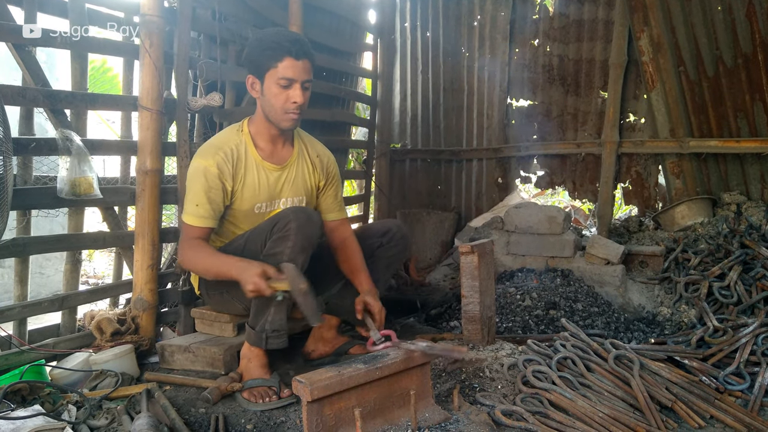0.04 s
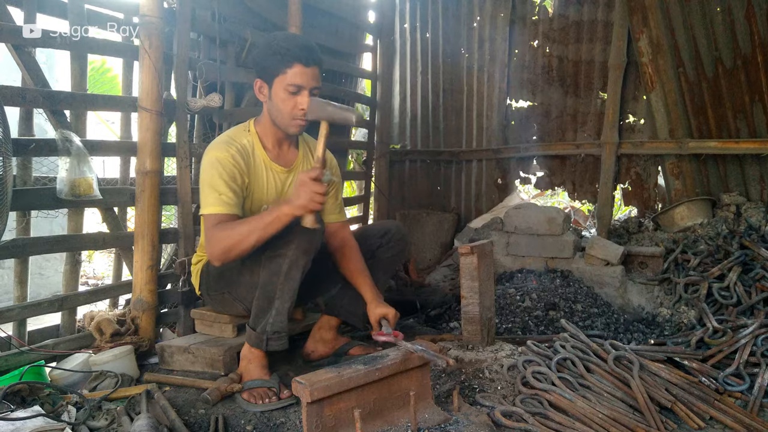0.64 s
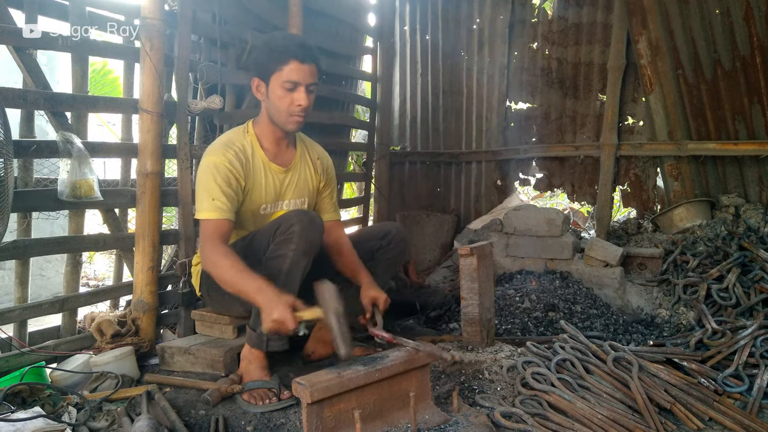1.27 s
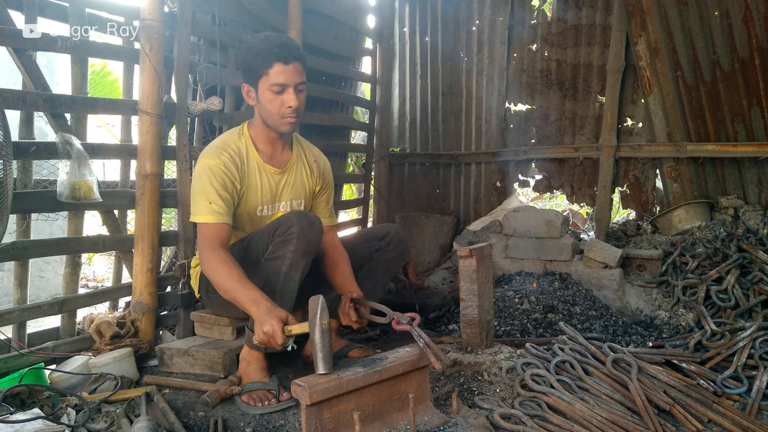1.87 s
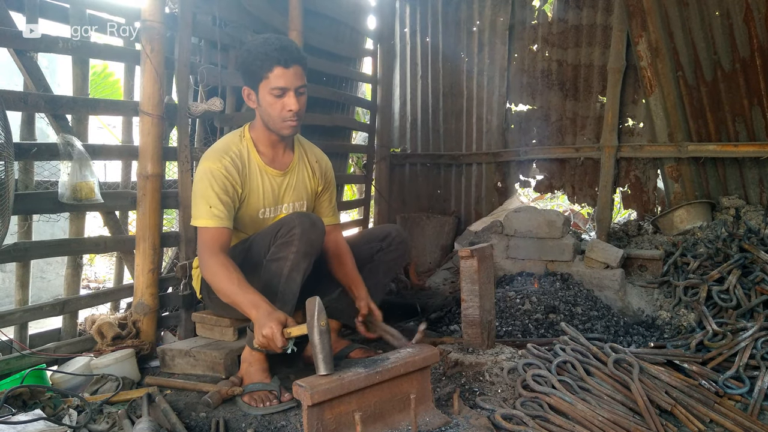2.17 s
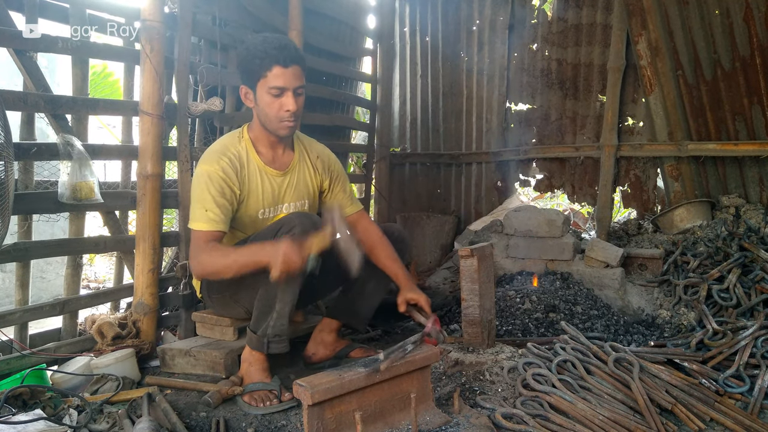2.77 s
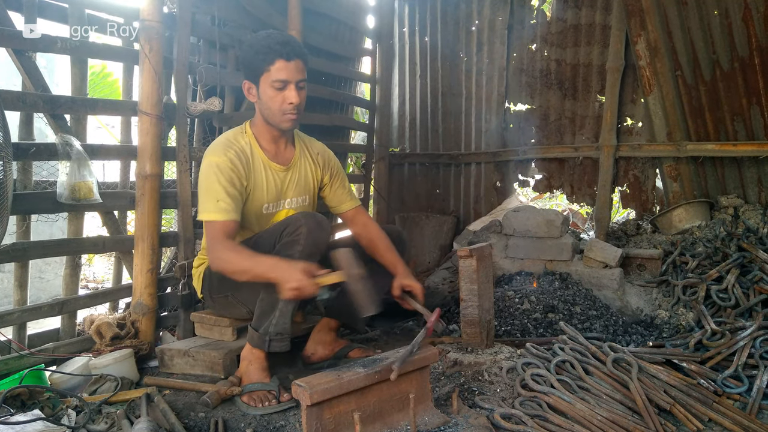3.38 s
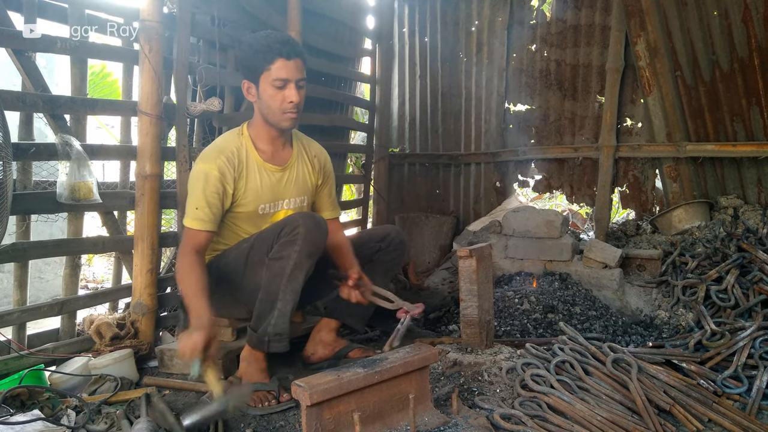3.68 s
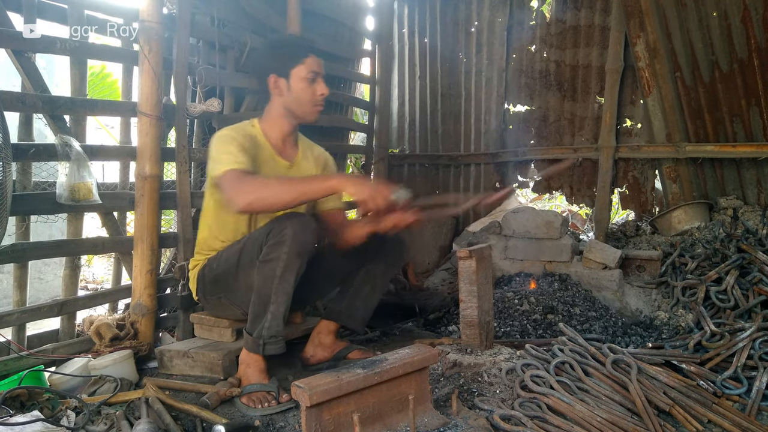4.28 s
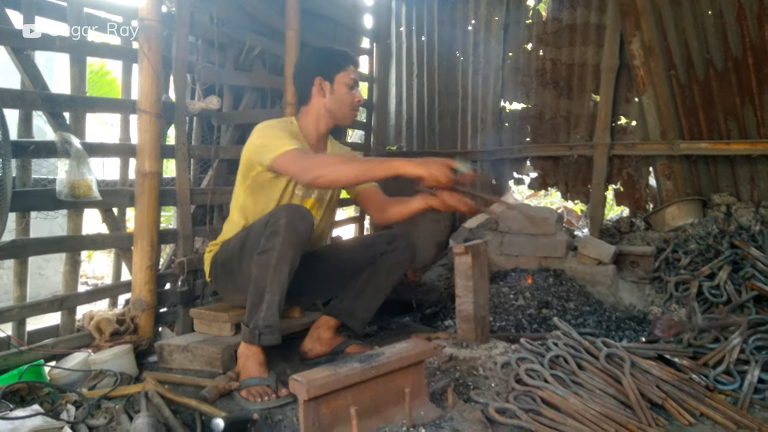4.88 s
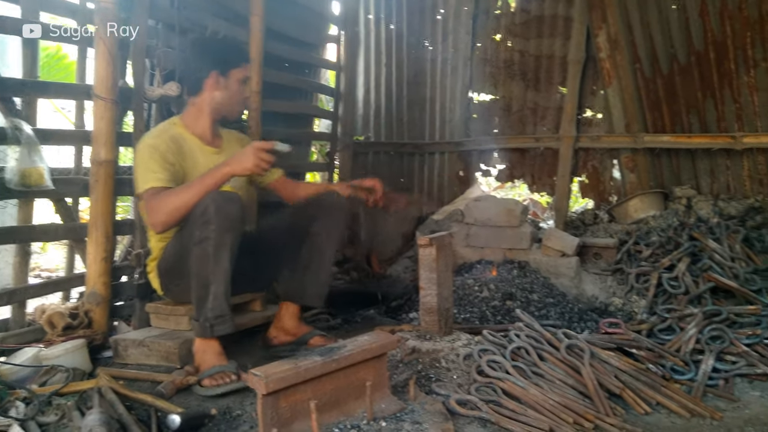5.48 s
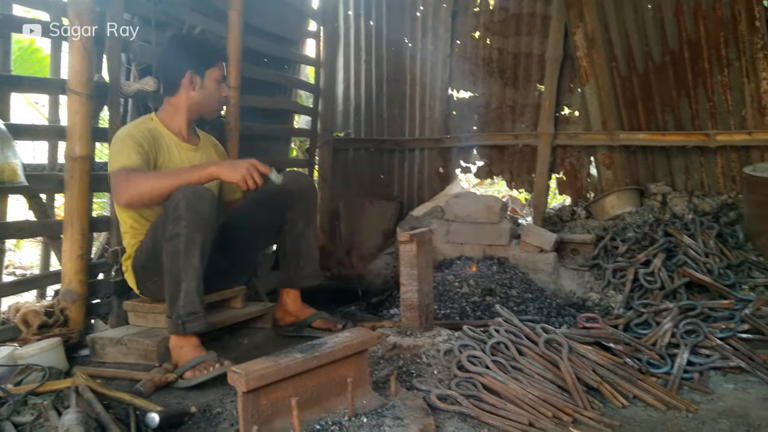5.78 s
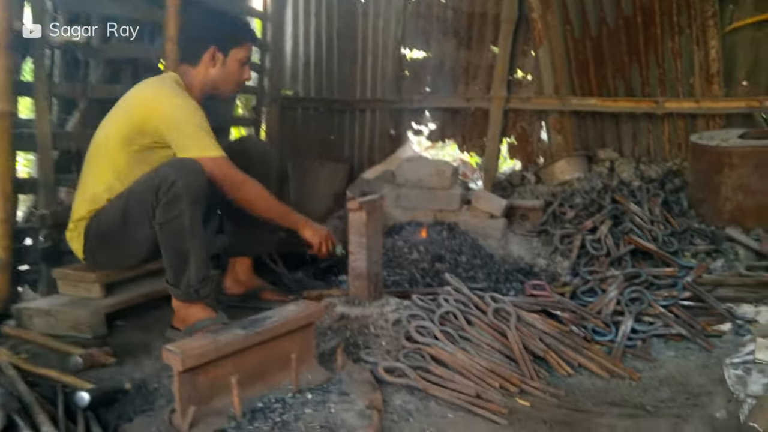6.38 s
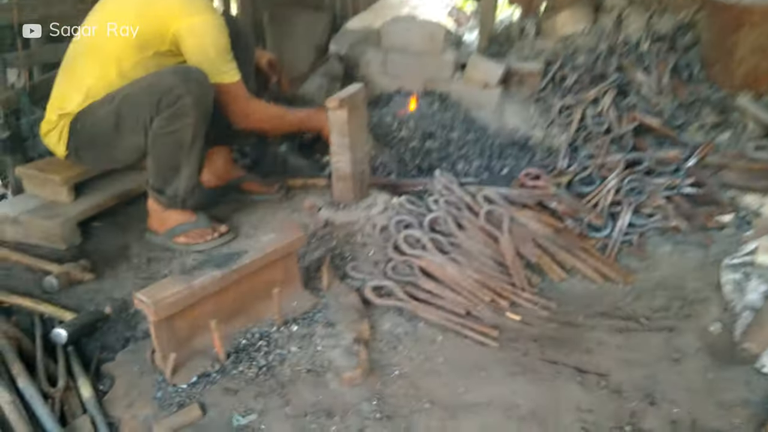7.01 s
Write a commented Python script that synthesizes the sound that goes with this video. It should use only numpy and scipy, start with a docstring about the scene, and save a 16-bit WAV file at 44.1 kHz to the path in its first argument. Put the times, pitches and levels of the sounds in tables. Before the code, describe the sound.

Sharp, ringing hammer blows on an iron anvil, then iron clattering onto iron twice, over a steady forge roar in a small shed.

```python
"""A small tin shed: a smith strikes hot iron on a rail anvil, rests the hammer on it, and strikes again.
He drops the hammer among his tools and throws the forged piece onto a heap of iron. Each impact cracks,
thuds and rings the iron's modes, echoed by the walls; tongs tick and iron scrapes in between.
Air blown through the crackling forge roars throughout, and a distant engine gathers speed outside.
The blows overload the microphones."""
import sys
import numpy as np
from scipy import signal
from scipy.fft import rfft, irfft
from scipy.io import wavfile
from scipy.ndimage import uniform_filter1d

SR = 44100
rng = np.random.default_rng(int(sys.argv[2]) if len(sys.argv) > 2 else 0)


def unload_wav(signal):
    """Save mono or channel-first audio to the path in sys.argv[1] as 16-bit WAV at rate SR, clipped to [-1, 1]."""
    wavfile.write(
        sys.argv[1],
        SR,
        np.round(np.clip(np.atleast_2d(signal).T, -1, 1) * 32767).astype(np.int16),
    )


N = 310905
AGE_S = np.arange(24576) / SR  # time since an impact

# Spectra of a sharp snap and of loose iron colliding. Each row: frequency in Hz, density in dB.
SNAP_SPECTRUM = [(300, -14), (1500, -63), (3000, -15), (5500, -8), (8000, 0.5), (10000, 1.5), (12000, 6),
                 (13500, -2.5), (15500, -7)]
CLANK_SPECTRUM = [(300, -29), (1500, -14), (3000, -12), (5500, -10), (8000, -2.5), (10000, -2),
                  (12000, 1.5), (13500, 1), (15500, -10)]
# Resonances of the tool pile. Each row: centre in Hz, width in Hz, boost in dB.
TOOL_PILE_PEAKS = [(3120, 1100, 8), (7100, 500, -1), (11500, 440, 7)]
# Iron landing on iron. Each row: start in seconds, object, then crack, thud, ring and left-right in dB.
CLANKS = [(3.8734, "tools", 7, 0, 2, 5.5), (3.892, "tools", -7, -15, -12, 5),
          (3.9120, "tools", -4.5, -16, -6.5, -5.5), (3.9430, "bar", -9.5, -37, -1.5, -2.5),
          (3.9560, "bar", -10, -46, -24, -1), (3.998, "bar", -30, -42, -27, 6),
          (3.9920, "small tools", -23, -33, -9.5, -2.5), (4.047, "small tools", -28.5, -30, -19, -1),
          (4.8934, "piece", 0, -18.5, -4, -3), (4.9220, "piece", 0, -16, -2.5, 4.5),
          (4.944, "heap", -4.5, -47, -7.5, -12), (4.967, "heap", -16, -50, -11, 0),
          (4.9980, "heap", -14.5, -46, -14, -3), (5.0460, "heap", -20, -46, -19, -2),
          (5.0820, "heap", -24, -41, -16, -3), (5.138, "rod", -27, -37, -19, 2),
          (5.147, "rod", -22, -44, -14.5, -1.5), (5.3205, "tongs", -30, -53, -26, -6),
          (5.3330, "tongs", -39, -50, -13, -5), (5.3480, "tongs", -40, -49, -37, 0)]


def amp(db):
    """Decibels to gain."""
    return 10 ** (np.asarray(db) / 20)


def curve_at(points, hz):
    """Interpolate a table over log frequency."""
    points_hz, value = np.transpose(points)
    return np.interp(np.log(hz + 1), np.log(points_hz + 1), value)


def add(mix, start_s, sound):
    """Mix a stereo sound in at start_s."""
    part = mix[:, round(start_s * SR):][:, :sound.shape[1]]
    part += sound[:, :part.shape[1]]


def decay(t60_s):
    """Exponential decay, 60 dB in t60_s."""
    return amp(-60 * AGE_S / t60_s)


def arch(start_s, length_s):
    """Half-sine envelope."""
    return np.sin(np.pi * np.clip((np.arange(N) / SR - start_s) / length_s, 0, 1))


def waver(rms_db, top_hz):
    """Slow random gain."""
    t = np.arange(0, N, 256) / SR
    rates_hz = np.geomspace(top_hz / 20, top_hz, 20)
    drift = sum(np.sin(2 * np.pi * (hz * t + rng.random())) for hz in rates_hz) / np.sqrt(10)
    return amp(rms_db * np.interp(np.arange(N) / SR, t, drift))


def diffuse_noise(spectrum, size=len(AGE_S), peaks=(), left_lag_s=0.000104):
    """Coloured noise reaching two microphones from all round the shed; unit RMS in mono."""
    # Each row: frequency in Hz, coherence between the microphones.
    coherences = [(60, 1.1), (130, 1), (290, 1.3), (640, 1.13), (1410, 0.09), (3100, 0.44), (6820, -0.2452),
                  (15000, 0.13)]
    # Each row: frequency in Hz, left-right balance in dB.
    balance = [(60, -1), (110, -0.5), (200, 0), (380, 0), (700, 0.5), (1290, 0), (2380, 3.5), (4400, 0),
               (8120, -0.5), (15000, -2.0)]
    hz = np.fft.rfftfreq(size, 1 / SR)
    left, unrelated = rng.standard_normal((2, len(hz))) + 1j * rng.standard_normal((2, len(hz)))
    coherence = np.clip(curve_at(coherences, hz), 0, 1)
    right = coherence * left + np.sqrt(1 - coherence ** 2) * unrelated
    right *= np.exp(2j * np.pi * hz * left_lag_s)
    pan = amp(curve_at(balance, hz) / 2)
    peaks_db = sum(db / (1 + (2 * (hz - centre_hz) / width_hz) ** 2) for centre_hz, width_hz, db in peaks)
    noise = irfft(np.array([left * pan, right / pan]) * amp(curve_at(spectrum, hz) + peaks_db), size)
    return noise / noise.mean(0).std()


def shed_echo(t60_s, tail_db=-34, tail_t60_s=0.74, rise_s=0.00021):
    """Echo envelope: the close walls answer at once and a faint tail lingers."""
    return (decay(t60_s) + amp(tail_db) * decay(tail_t60_s)) * (1 - np.exp(-AGE_S / rise_s))


def forge(rumble_db=-38.5, roar_db=-35.5, hiss_db=-33.5, crackle_db=-48, crackles_per_s=14):
    """Air blown through coals: rumble, humming roar, hiss and faint crackle."""
    # Each row: frequency in Hz, density in dB.
    rumble_spectrum = [(20, -18), (40, -1.5), (56, -7.5), (85, 2), (105, -6.5), (125, -7.5), (200, -13.5),
                       (500, -66)]
    roar_spectrum = [(65, -35), (110, -16), (183, 2.5), (227, -6), (284, -0.5), (403, -6), (439, -3),
                     (567, -1.5), (701, -8.5), (934, -2), (1130, -10), (1400, -10.5), (1820, -62),
                     (3080, -120)]
    hiss_spectrum = [(820, -62), (1400, 0.5), (1490, -9), (1710, 0), (1990, -5.5), (2120, -3), (2460, -3),
                     (2640, -0.5), (3580, -1), (4560, 0.5), (6040, -1.5), (7320, 3), (10000, -5),
                     (11600, -3.5), (15600, -10)]
    # Steady hums. Each row: centre in Hz, width in Hz, boost in dB.
    low_hums = [(70.4, 5.4, 5), (102, 5.4, 6)]
    hums = [(189, 13.4, 2), (401.2, 18.6, 9.2), (562, 11, 3.6), (867.7, 13.5, 9.2), (951, 18, 5.6),
            (1620, 90, 5.9), (2157, 43, 8.2), (2746, 21, 11.1), (5270, 140, 4.2), (7160, 1400, 0.82)]
    rumble = amp(rumble_db) * diffuse_noise(rumble_spectrum, N, low_hums)
    roar = amp(roar_db) * diffuse_noise(roar_spectrum, N, hums) * waver(rms_db=0.5, top_hz=12)
    hiss = amp(hiss_db) * diffuse_noise(hiss_spectrum, N, hums) * waver(rms_db=0.7, top_hz=18)
    impulses = (rng.random(N) < crackles_per_s / SR) * rng.uniform(0.16, 1, N)
    snap = diffuse_noise(SNAP_SPECTRUM) * (decay(0.015) + 0.19 * decay(0.067))
    crackle = signal.oaconvolve(impulses[None], snap, axes=1)[:, :N]
    return rumble + roar + hiss + amp(crackle_db) * crackle / crackle.std()


def engine(idle_hz=43.7, cruise_hz=57, pull_away_s=1.2, run_up_s=4.7, octave_db=-20):
    """A far engine speeds up; only its firing rate and a weak octave reach the shed."""
    # Each row: time in seconds, level in dB.
    levels = [(0.0, -47), (1.95, -45), (2.16, -33), (2.75, -47), (3.48, -33), (4.05, -43), (4.7, -37.5),
              (5.15, -43), (7.05, -50)]
    t = np.arange(N) / SR
    run_up = np.sin(np.pi / 2 * np.clip((t - pull_away_s) / run_up_s, 0, 1)) ** 2
    firing_hz = idle_hz + (cruise_hz - idle_hz) * run_up
    phase = 2 * np.pi * (np.cumsum(firing_hz) / SR + rng.random())
    drone = np.sqrt(2) * (np.sin(phase) + amp(octave_db) * np.sin(2 * phase))
    return drone * amp(np.interp(t, *np.transpose(levels))) * waver(rms_db=1.0, top_hz=3.1)


def hoot_and_squeak():
    """Two faint, brief tones: a far-off hoot and a thin squeak."""
    # Each row: start in seconds, length in seconds, pitch in Hz, level in dB.
    tones = [(-0.02, 0.085, 621, -31.5), (6.574, .12, 2710, -45)]
    t = np.arange(N) / SR
    return sum(amp(db) * arch(start_s, length_s) * np.sin(2 * np.pi * hz * t)
               for start_s, length_s, hz, db in tones)


def scrapes(grain_db=3, grains_per_s=500):
    """Iron dragged over iron and grit, catching as it goes."""
    # Each row: start in seconds, length in seconds, level in dB.
    strokes = [(0.202, 0.024, -33), (0.318, 0.072, -34.5), (0.876, .07, -33.5), (2.943, 0.036, -31.5),
               (3.076, 0.091, -34.5), (5.31, 0.039, -32), (6.6, 0.04, -35.5), (6.758, 0.052, -34.5),
               (6.908, 0.04, -32.5)]
    # Each row: frequency in Hz, density in dB.
    spectrum = [(500, 0), (2000, -0.5), (5000, 1.5), (8000, 2.5), (12000, -5), (15500, -21)]
    grains = rng.standard_normal(N)[(np.arange(N) * grains_per_s / SR).astype(int)]
    envelope = sum(amp(db) * arch(start_s, length_s) for start_s, length_s, db in strokes)
    return diffuse_noise(spectrum, N) * envelope * amp(grain_db * grains)


def ticks(events, echo_db=-10, snap_t60_s=0.0094):
    """A short, bright snap and its echo for each event."""
    # Each row: frequency in Hz, density in dB.
    spectrum = [(300, -22), (1500, -7), (5500, -10), (8000, -2), (12000, 2.5), (13500, -8), (15500, -10)]
    out = np.zeros((2, N))
    envelope = decay(snap_t60_s) + amp(echo_db) * shed_echo(t60_s=0.26)
    for start_s, db in events:
        add(out, start_s, amp(db) * diffuse_noise(spectrum) * envelope)
    return out


def tong_touches():
    """The tongs tap the work lightly."""
    # Each row: start in seconds, level in dB.
    touches = [(0.421, -22.5), (0.939, -24.5), (1.947, -22), (2.951, -26), (4.7889, -27.5)]
    return ticks(touches)


def coal_pops(count=6, max_db=-26.5, range_db=7):
    """Coals pop at random times and levels."""
    return ticks([(when * N / SR, max_db - range_db * drop) for when, drop in rng.random((count, 2))])


def crack(spectrum, t60_s, peaks=()):
    """The snap of contact, scattered by the tin walls."""
    return diffuse_noise(spectrum, peaks=peaks) * shed_echo(t60_s)


def air_push(at_s, width_s):
    """A dip in pressure and its rebound."""
    u = (AGE_S - at_s) / width_s
    return 2 * u * np.exp(-u ** 2 / 2)


def thud(t60_s, push_db, wash_db=0, push_s=0.00053, lag_s=0.002, low_cut_hz=160):
    """The struck mass, too small for deep bass, shoves the air once; reflections and a wash follow."""
    # Near walls. Each row: delay in seconds, level in dB, left-right in dB.
    walls = [(.0035, -18, 4), (0.0114, -10.5, -3), (0.0181, -19, 7), (.027, -17.5, -5)]
    # Each row: frequency in Hz, density in dB.
    wash_spectrum = [(30, -10), (90, 5), (180, -7), (300, 0.5), (500, -1.5), (850, -2), (1300, -2),
                     (2500, -3.5), (5000, -3.5), (12000, -13.5)]
    echoes = sum(amp([[db + pan_db / 2], [db - pan_db / 2]]) * air_push(lag_s + delay_s, push_s)
                 for delay_s, db, pan_db in walls)
    low_cut = signal.butter(2, low_cut_hz, "high", fs=SR)
    knock = signal.lfilter(*low_cut, air_push(lag_s, push_s) + echoes)
    wash = diffuse_noise(wash_spectrum) * shed_echo(t60_s)
    return amp(wash_db) * wash + amp(push_db) * knock


def ring(modes, wet_db=-3, echo_t60_s=0.16, right_lag_s=5.1e-5):
    """Struck iron rings in decaying modes, heard directly and blurred by the walls."""
    age_s = AGE_S - np.array([[0], [right_lag_s]])
    echoes = rng.standard_normal((2, len(AGE_S))) * shed_echo(echo_t60_s)
    room = (AGE_S == 0) + amp(wet_db) * echoes / np.linalg.norm(echoes, axis=1, keepdims=True)
    room_power = uniform_filter1d((abs(rfft(room)) ** 2).mean(0), size=9)
    flatten = np.sqrt(room_power.mean() / room_power)  # keeps the modes' balance through the room
    bins_hz = np.fft.rfftfreq(len(AGE_S), 1 / SR)
    direct = np.zeros_like(age_s)
    for hz, db, t60_s in modes:
        gain = amp(db) * np.interp(hz, bins_hz, flatten)
        direct += gain * decay(t60_s) * np.sin(2 * np.pi * (hz * age_s + rng.random()))
    return signal.fftconvolve(direct, room, axes=1)[:, :len(AGE_S)]


def hammering():
    """Each blow cracks, thuds and rings the rail, the hammer head and loose iron on the anvil."""
    # Each row: start in seconds, then levels in dB of crack, thud, rail ring, long rail note,
    # head ring, head overtone and loose iron.
    blows = [(1.0466, 1.5, -5, -26, -36, -3, -20, -20), (1.157, -29, -28, -40, -27, -44, -44, -21),
             (1.4207, -9, -6, -3, -2, -4, -3.5, -5.5), (1.573, -15, -9.5, -8, -14, -22, -9, -0.5),
             (1.6457, -36, -21.5, -24, -24, -32, -24, -12), (1.656, -36, -21, -33, -30, -32, -26, -11),
             (1.686, -40, -23.5, -37, -28, -34, -29, -26), (1.7200, -49, -27, -43, -19, -39, -34, -38),
             (3.3618, 8.5, -1.5, -14, -9.5, -1, -1, -5), (3.469, -16, -29, -34, -28, -29, -29, -32),
             (3.478, -20, -28, -34, -31, -29, -31, -34), (3.535, -45, -31.5, -35, -24, -38, -38, -40)]
    # Each row: frequency in Hz, level in dB, T60 in seconds.
    rail_modes = [(4990, -7, .06), (5050, -3, 0.06), (5135, -2, 0.05), (5260, -6, .05), (6855, -3, 0.075),
                  (6925, -6, 0.085), (7100, -8, .05), (7220, -9, .06), (8427, -8, 0.11), (8632, -3, 0.13),
                  (10945, -7, 0.11)]
    rail_note = [(3275, -13, .35)]
    head_mode = [(9800, -5, .19)]
    head_overtone = [(12495, -8, .3)]
    loose_modes = [(3090, -17, .1), (4660, -13, 0.06), (4730, -14, 0.06), (5150, -14, 0.05),
                   (5720, -9, 0.07), (5776, -11, .08), (8427, -6, 0.15), (8570, -11, .12), (8660, -8, 0.14),
                   (11250, -16, 0.07), (11680, -15, .07), (13500, -20, 0.1)]
    out = np.zeros((2, N))
    for start_s, crack_db, thud_db, rail_db, note_db, head_db, overtone_db, loose_db in blows:
        knock = amp(thud_db) * thud(t60_s=0.13, push_db=4, wash_db=-1)
        snap = amp(crack_db) * crack(SNAP_SPECTRUM, t60_s=0.15)
        rail = amp(rail_db) * ring(rail_modes) + amp(note_db) * ring(rail_note, wet_db=-21.5)
        head = amp(head_db) * ring(head_mode, right_lag_s=4e-5)
        head += amp(overtone_db) * ring(head_overtone, wet_db=-7, right_lag_s=1.5e-5)
        add(out, start_s, knock + snap + rail + head + amp(loose_db) * ring(loose_modes))
    return out


def jangle(peaks, mean_count=170, t60_s=0.2):
    """A shaken pile of iron: many weak modes at random pitches."""
    spectrum = rfft(diffuse_noise(CLANK_SPECTRUM, peaks=peaks))
    bins = spectrum.shape[1]
    modes = irfft(spectrum * (rng.random(bins) < mean_count / bins))
    return modes / modes.mean(0).std() * decay(t60_s)


def clatter(name, modes, pile_peaks, crack_t60_s, jangle_share=0.7):
    """Iron bounces on iron: a crack, the pile's jangle, a thud and the named object's ring."""
    out = np.zeros((2, N))
    pile = np.sqrt(jangle_share) * jangle(pile_peaks)
    for start_s, struck, crack_db, thud_db, ring_db, pan_db in CLANKS:
        if struck != name:
            continue
        snap = np.sqrt(1 - jangle_share) * crack(CLANK_SPECTRUM, crack_t60_s, pile_peaks)
        knock = amp(thud_db) * thud(t60_s=0.17, push_db=-25)
        clank = amp(crack_db) * (snap + pile) + knock + amp(ring_db) * ring(modes, wet_db=0.5)
        add(out, start_s, clank * amp([[pan_db / 2], [-pan_db / 2]]))
    return out


def dropped_hammer():
    """The hammer falls among the tools, ringing them and an iron bar."""
    # Each row: frequency in Hz, level in dB, T60 in seconds.
    tool_modes = [(2550, -17, .15), (2884, -7.5, .17), (3340, -14, .16), (3663, -13, .14), (4280, -14, .15),
                  (4565, -12, .18), (4850, -14, .15), (5350, -14, .15), (5768, -6, .15), (5978, -9, .16),
                  (7350, -10, .13), (8376, -12, .13), (8755, -13, .17), (10760, -8, .15), (10946, -1, .17),
                  (11950, -1, .14), (12657, 3, .13), (13781, -8, .14), (14440, -9, .13)]
    bar_modes = [(4565, -27, .22), (5982, -9.5, .27), (6532, -18, .24), (9960, -10, .15), (10228, -11, .22),
                 (10795, -9, .24), (10945, -10, .15), (11230, -12, .15), (12731, -14, .13),
                 (13250, -17, .2)]
    small_tool_modes = [(1846, -25, 0.32), (2557, -19, 0.22), (2700, -18, .12), (2850, -19, .11),
                        (3260, -17, .12), (3405, -14, 0.12), (4102, -18, 0.16), (5020, -18, .12),
                        (5130, -19, .12), (6126, -18, 0.28), (6664, -13, .18), (7100, -14, .15),
                        (7806, -18, .25), (8800, -16, .16), (9437, -17, .3)]
    return (clatter("tools", tool_modes, TOOL_PILE_PEAKS, crack_t60_s=0.19)
            + clatter("bar", bar_modes, TOOL_PILE_PEAKS, crack_t60_s=0.12)
            + clatter("small tools", small_tool_modes, TOOL_PILE_PEAKS, crack_t60_s=0.15))


def low_boom(push_db=-5, push_s=0.003, rumble_db=-16, t60_s=0.34):
    """A deep push and short low rumble as the hammer's crash overloads the microphones."""
    # Each row: frequency in Hz, density in dB.
    spectrum = [(25, 2), (60, 8), (110, -3), (170, -5), (300, -28), (700, -55)]
    out = np.zeros((2, N))
    u = AGE_S / push_s
    push = -amp(push_db) * u * np.exp(1 - u)
    rumble = amp(rumble_db) * diffuse_noise(spectrum) * shed_echo(t60_s)
    add(out, CLANKS[0][0], push + rumble)
    return out


def microphone_swing(level_db=-2, swing_hz=2.8, t60_s=1.35):
    """The left microphone, overloaded as the hammer lands close by, swings off centre and back to rest."""
    out = np.zeros((2, N))
    envelope = amp(level_db) * decay(t60_s) * (1 - AGE_S / AGE_S[-1])
    swing = -envelope * np.cos(2 * np.pi * swing_hz * AGE_S)
    add(out, CLANKS[0][0], swing * np.array([[1], [0]]))
    return out


def thrown_piece():
    """The forged piece lands, ringing itself, the iron heap and a rod in it."""
    # Each row: frequency in Hz, level in dB, T60 in seconds.
    piece_modes = [(1528, -25, .15), (3900, -19, .13), (4230, -14, .12), (4620, -14, .13), (5480, -15, .13),
                   (5587, -11.5, .15), (6325, -15, .12), (7520, -14, .15), (8123, -10, .16),
                   (8210, -13, .14), (9119, -9, .15), (9407, -9, .15), (11000, -9, .18), (11350, -8, .16),
                   (11860, -8, .18), (12125, -7, .18), (13261, -11, .14), (13420, -11, .15),
                   (14700, -15, .13)]
    heap_modes = [(2971, -26, .2), (3620, -19, .15), (4096, -20, .15), (4573, -19, .16), (5200, -21, .15),
                  (5560, -20, .15), (5765, -23, .18), (6532, -29, .3), (6605, -26, .25), (7531, -23, .2),
                  (9345, -15, .19), (10447, -13, .38), (11600, -15, .25), (12080, -11, .27),
                  (12238, -15, .24), (12630, -18, .31), (13202, -20, .17), (13428, -18, .2),
                  (13668, -22, .3)]
    rod_modes = [(2880, -23, .14), (3750, -19, .12), (4829, -14, .17), (5991, -17, .15), (7215, -3, 0.13),
                 (8597, -11, 0.27), (9555, -14, .14), (10060, -14, .18), (10940, -18, .25), (11600, -6, .2),
                 (12610, -19, .3)]
    # Each row: centre in Hz, width in Hz, boost in dB.
    heap_peaks = [(4230, 270, 5.2), (4400, 210, 5.1), (5540, 250, 8.3), (8100, 690, 4), (11540, 1500, 7.9)]
    return (clatter("piece", piece_modes, heap_peaks, crack_t60_s=0.18)
            + clatter("heap", heap_modes, heap_peaks, crack_t60_s=0.14)
            + clatter("rod", rod_modes, heap_peaks, crack_t60_s=0.53))


def tongs_down():
    """The tongs clink onto the tools."""
    # Each row: frequency in Hz, level in dB, T60 in seconds.
    modes = [(3614, -20, .09), (4950, -16, .08), (5049, -13, .1), (6000, -19, .1), (6650, -17, .09),
             (8295, -16, .16), (8497, -16, .16), (9450, -18, .12), (9900, -17, .12), (10451, -14, .17),
             (10847, -15, .18), (11170, -13, .25), (12618, -12, .13)]
    return clatter("tongs", modes, TOOL_PILE_PEAKS, crack_t60_s=0.12)


def scene():
    """The smith's work over the forge and a distant engine."""
    landings = dropped_hammer() + low_boom() + thrown_piece() + tongs_down()
    blows = hammering()
    small_sounds = coal_pops() + tong_touches() + scrapes()
    return landings + blows + small_sounds + forge() + engine() + hoot_and_squeak()


def record(dry, threshold_db=-3, recovery_db_per_s=300, cutoff_hz=15720):
    """A fast limiter holds the blows down; the left microphone's swing joins, peaks clip softly, a low-pass
    follows."""
    power_db = 10 * np.log10(abs(uniform_filter1d((dry ** 2).mean(0), size=160)) + 1e-12)
    recovery_db = np.arange(N) * recovery_db_per_s / SR
    envelope_db = np.maximum.accumulate(power_db + recovery_db) - recovery_db
    over_db = np.maximum(envelope_db - threshold_db, 0)
    gain_db = -0.8 * uniform_filter1d(over_db, size=100)  # 5:1 ratio
    held = dry * amp(gain_db) + microphone_swing()
    clipped = 1.05 * held / (1 + abs(held) ** 6) ** (1 / 6)
    low_pass = signal.firwin(1023, cutoff_hz, window=("kaiser", 8), fs=SR)
    return signal.oaconvolve(clipped, low_pass[None], "same")


dry = scene()
out = record(dry)
unload_wav(out)
```